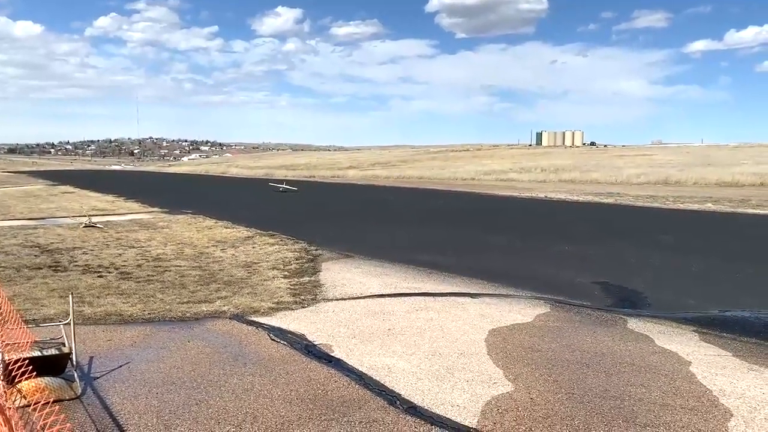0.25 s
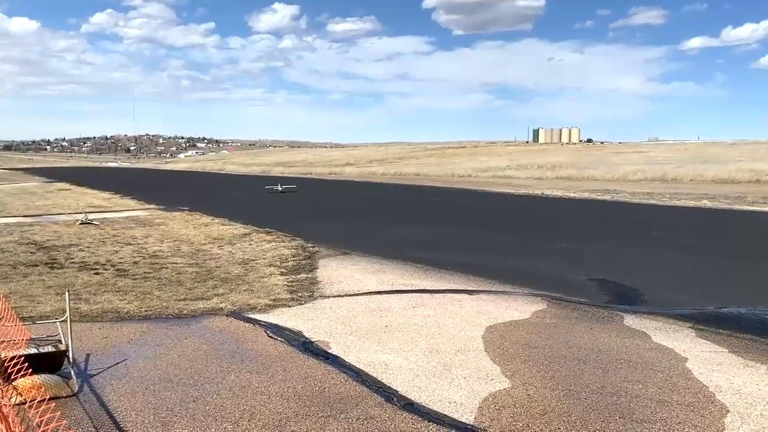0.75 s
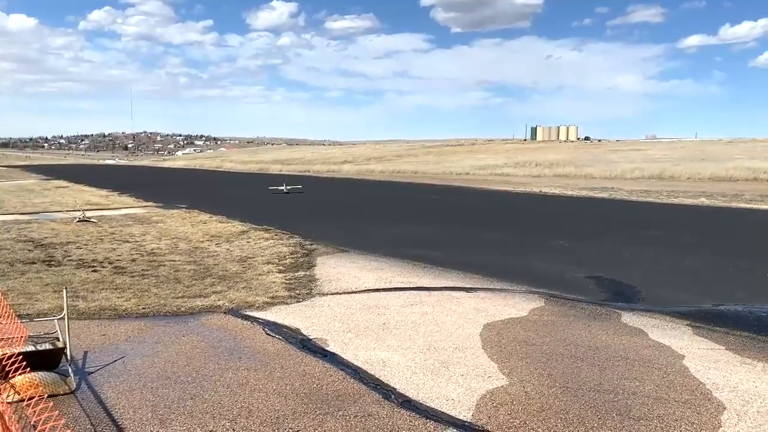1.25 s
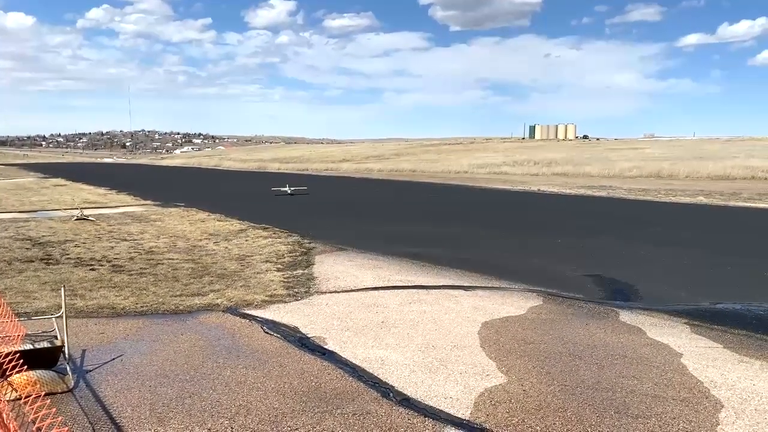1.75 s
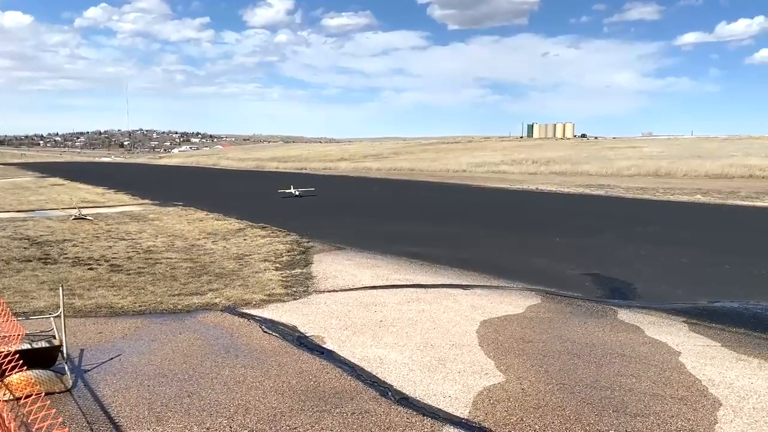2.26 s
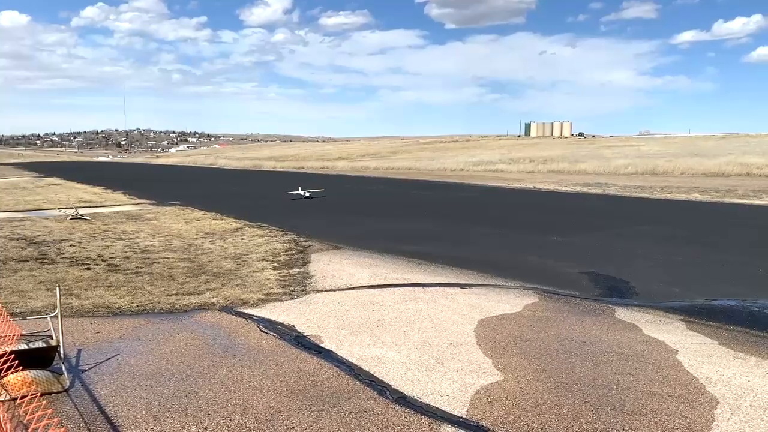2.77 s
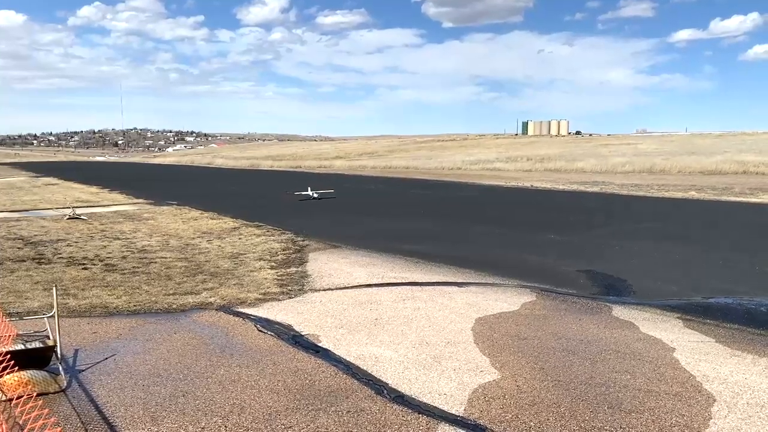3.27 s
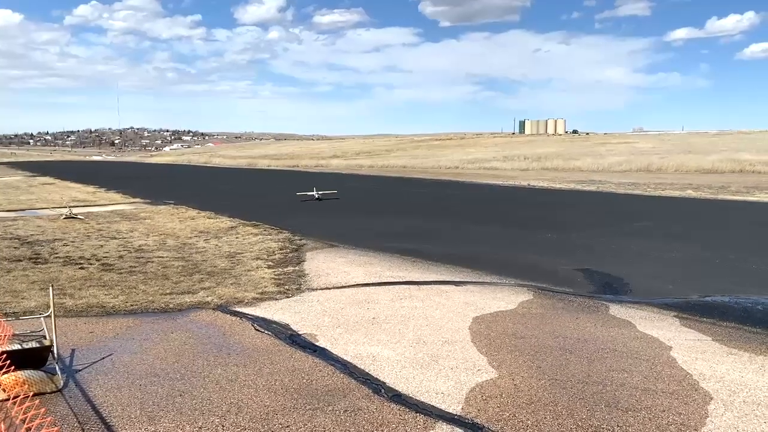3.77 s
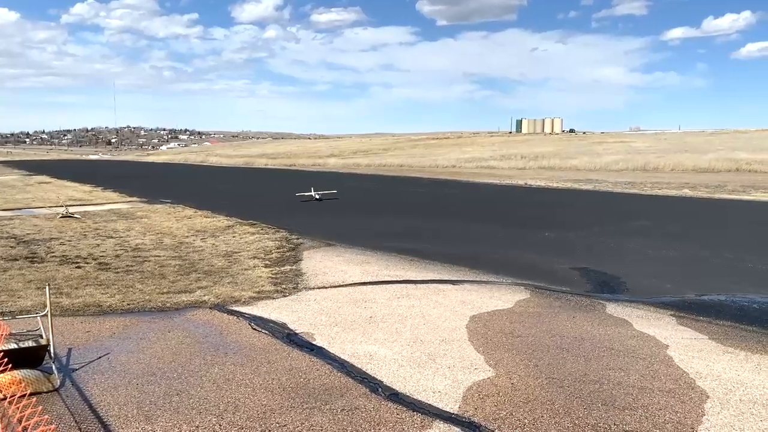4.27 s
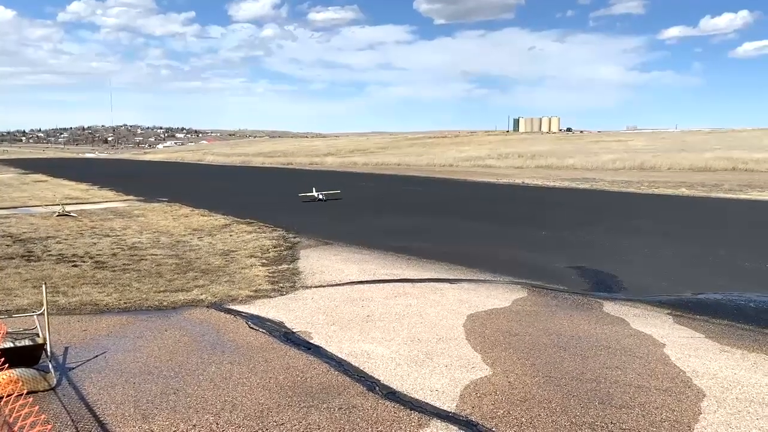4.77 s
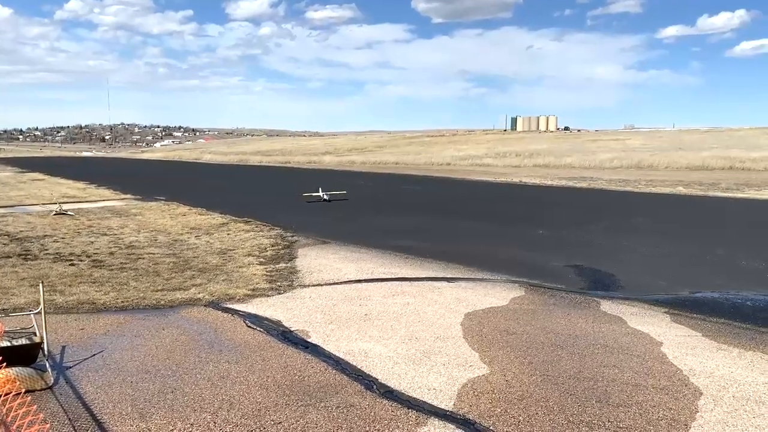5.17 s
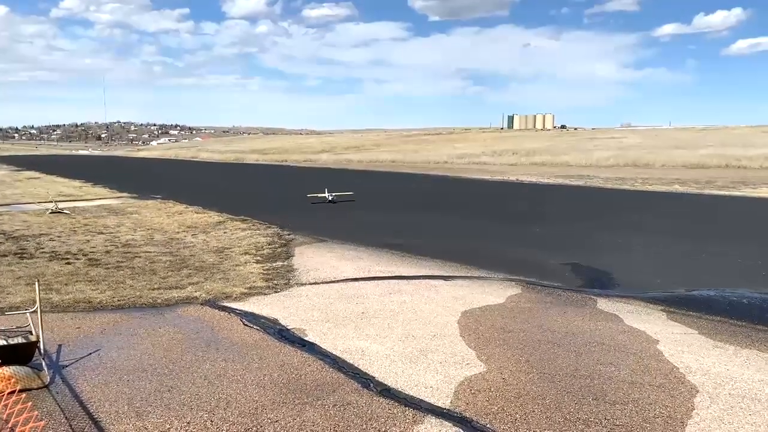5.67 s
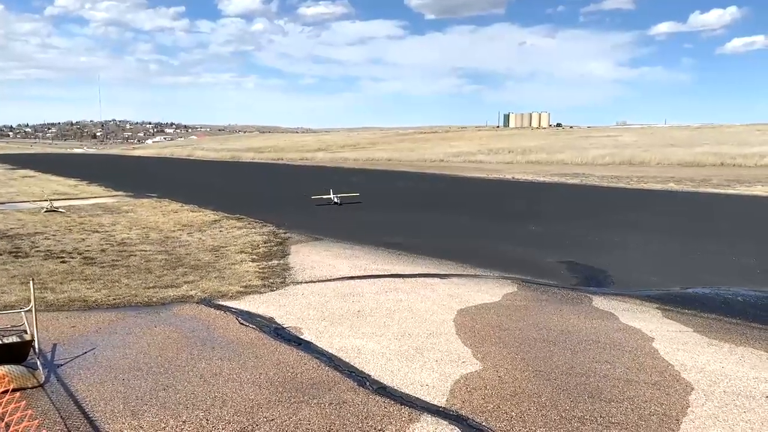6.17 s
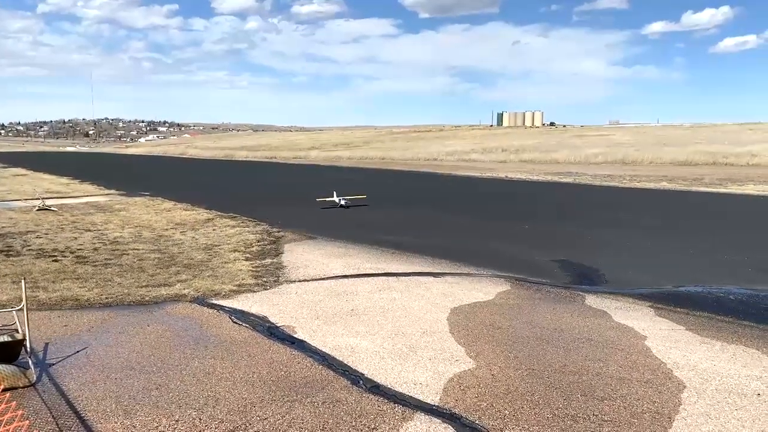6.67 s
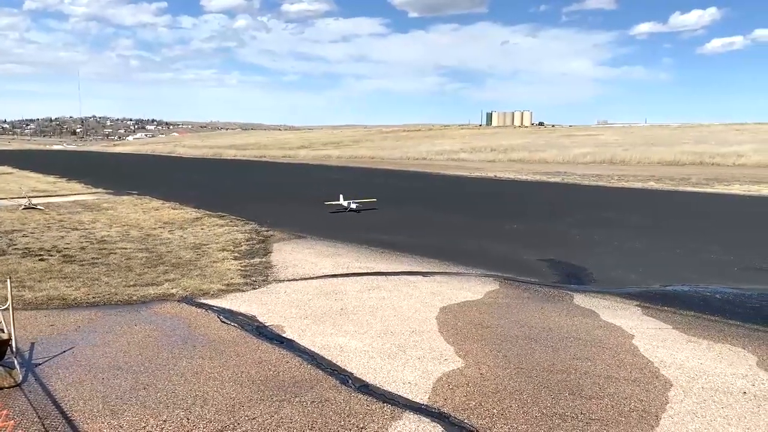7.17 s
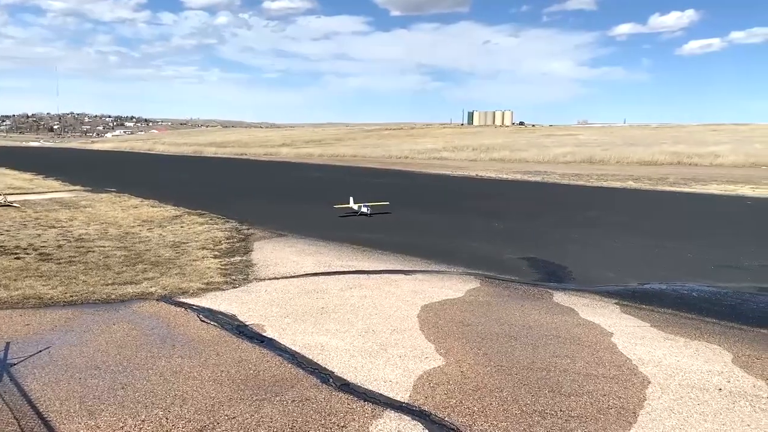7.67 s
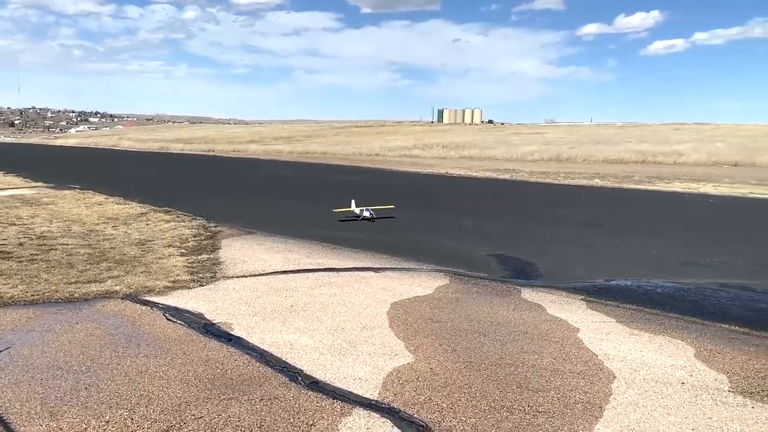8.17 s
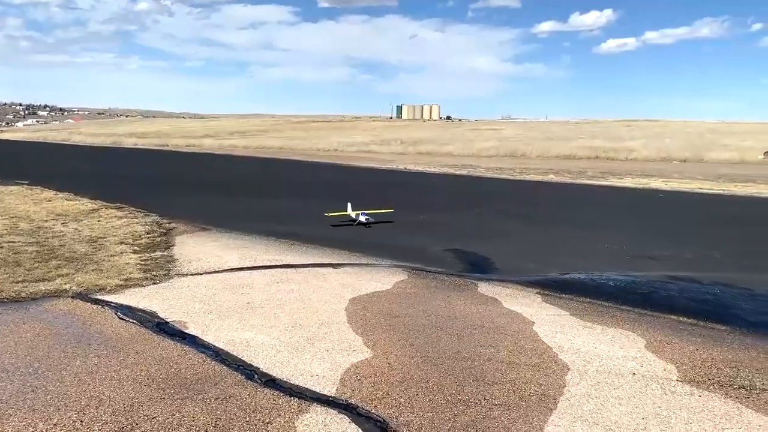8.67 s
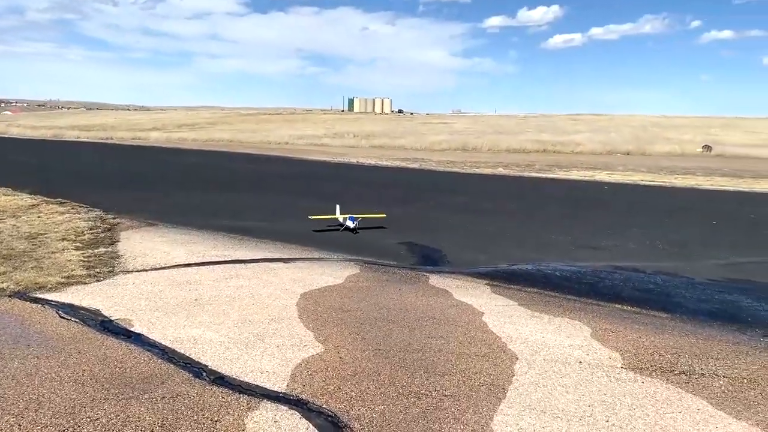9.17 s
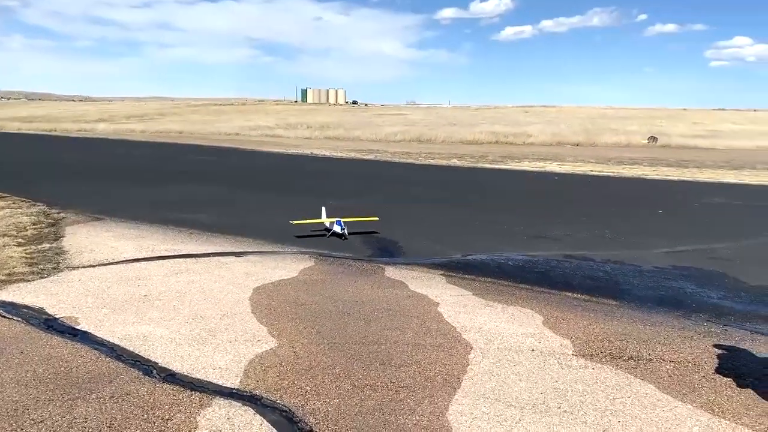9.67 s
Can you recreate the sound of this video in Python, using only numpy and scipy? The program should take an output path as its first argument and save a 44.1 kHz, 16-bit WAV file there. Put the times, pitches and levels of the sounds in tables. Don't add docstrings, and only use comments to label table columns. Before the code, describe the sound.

Faint electronic whistle and dry grass ticks under buffeting wind, then a model plane motor climbs to a steady whine, approaches and cuts out.

```python
import sys
import numpy as np
from scipy import signal
from scipy.fft import rfft, irfft, next_fast_len
from scipy.io import wavfile
from scipy.ndimage import uniform_filter1d

SR = 44100
rng = np.random.default_rng(int(sys.argv[2]) if len(sys.argv) > 2 else 0)


def dump_mix(stems):
    frames = np.atleast_2d(stems).T
    limited = np.clip(frames, -1, 1)
    pcm = np.round(limited * 32767).astype(np.int16)
    wavfile.write(sys.argv[1], SR, pcm)


def nominal_scale(level):
    x = np.asarray(level, float) / 20
    return 10 ** x


N = 437913
SIZE = next_fast_len(N)
POLE_PAIRS = 7

# time in seconds, level in dB.
ROAR = [(0.0, -54.5), (0.22, -59), (0.75, -54.5), (1.2, -54), (1.71, -56.5), (2.02, -53), (2.68, -54),
        (3.15, -56.5), (3.59, -59), (3.7, -60.5), (3.98, -64), (4.37, -59.5), (4.64, -56.5), (5.65, -50.5),
        (7.58, -45.5), (8.46, -42), (9.23, -43), (9.93, -47)]
# frequency in Hz, density in dB per Hz.
AIR_COLOUR = [(150, -13), (300, -5), (480, -11), (620, -1.5), (820, -1.5), (1150, -16.5), (1350, -6),
              (2000, -10), (2700, -11), (4600, -22), (8250, -25), (8700, -37), (11000, -34), (16000, -33)]
# start in seconds, end in seconds, change in dB.
HISS_LULLS = [
    (-.1, 0.566, -2.5),
    (2.68, 2.8, -4),
    (3.45, 3.9, -1.5),
    (9.64, 9.7, -4.5),
    (9.78, 9.855, -6),
]
# centre in Hz, width in Hz, gain in dB.
CASE_RESONANCES = [(2090, 80, -4.5), (3550, 69, 4), (4920, 240, 4), (5900, 160, -2), (8730, 1300, 10.5),
                   (1067, 240, 6.5),
                   (9950, 600, -3), (11300, 1500, -3), (12400, 450, 6), (13500, 900, -3), (2750, 900, -4.5)]
# time in seconds, level in dB.
WHIR_LEVEL = [
    (0, -73),
    (1.2, -72.5),
    (2.3, -73),
    (3.4, -85.5),
    (9.93, -83),
]
# time in seconds, frequency in Hz, level in dB.
WHISTLE = [(0.0, 8085, -84), (0.5, 8085, -74.5), (0.58, 8082, -88), (1.75, 8050, -88), (2.11, 8048, -69),
           (2.4, 8034, -73), (2.92, 8024, -67), (3.5, 8017, -71), (3.96, 8000, -80), (4.02, 8009, -63),
           (4.38, 8014, -58), (5.6, 8031, -66), (5.75, 8034, -60), (7.0, 8037, -61), (8.55, 8043, -52),
           (9.02, 8047, -54), (9.33, 8048, -70), (9.42, 8045, -100)]
# shaft order above the tone, level in dB.
BLADE_SIDEBANDS = [(2, -22), (4, -17), (6, -22), (8, -31), (14, -28)]
# time in seconds, electrical rate in Hz.
MOTOR_SPEED = [(3.55, 300), (3.7, 337), (3.9, 372), (4.0, 420), (4.12, 493), (4.26, 605), (4.29, 628),
               (4.385, 666), (4.45, 674), (4.53, 694), (4.59, 704), (4.77, 717), (5.46, 718), (5.72, 722.5),
               (7.84, 713.7), (9.0, 712.5), (9.1, 686), (9.17, 660)]
# time in seconds, magnetic effort in dB, slot whine in dB.
MOTOR_EFFORT = [(3.6, -97, -97), (3.75, -78, -93), (3.95, -56.5, -89), (4.1, -54, -75), (4.14, -48.5, -62),
                (4.27, -47, -58.5), (4.33, -51, -51.5), (4.355, -50, -69), (4.385, -51, -54.5),
                (4.6, -51.5, -54.5), (5.5, -58.5, -60.5), (7.0, -61, -58), (8.35, -54.5, -53),
                (8.8, -54.5, -60), (9.03, -59, -51), (9.12, -49, -68), (9.17, -87, -100)]
PARTIAL_ORDERS = [
    [0, 14],
    [0, 21],
    [0, 44],
    [0, 46],
    [0, 49],
    [0, 63],
    [0, 84],
    [1, -63],
    [1, -21],
    [1, -32],
    [1, -42],
    [1, 42],
    [0, 50],
    [1, -35],
]
# level in dB re effort, flutter in dB.
PARTIAL_LEVELS = [(-19, 6), (-16, 5), (-29, 4), (-27, 4), (-24, 6), (-22, 6), (-26, 6), (-23, 5), (-16, 3),
                  (-21, 4), (-14.5, 5), (-52, 5), (-18, 5), (-17, 5)]
ENTRY_HZ = {44: 650, 46: 650, 50: 650, -32: 650, 84: 525, -35: 600, 49: 430}
EXIT_HZ = {49: 540, -35: 660, -63: 540}
# frequency in Hz, gain in dB.
AIRFRAME = [(500, -17), (790, 12), (880, 14), (1100, -9), (1400, 10), (1480, 2), (1580, 6), (1700, -3),
            (2200, -8), (3100, 5), (3600, 7), (4350, 2), (4550, -10), (4800, -3), (5300, -10), (5900, -2),
            (6280, -13), (6420, 7), (6550, 7), (7000, 1), (7500, 3), (7800, -14), (11000, 19), (12300, 12)]
# time in seconds, level in dB.
BREEZE = [(0.0, -43), (0.15, -56.5), (1.16, -58.5), (1.9, -48.5), (2.2, -59.5), (3.3, -52.5), (4.45, -58.5),
          (5.35, -46.5), (6.17, -55), (6.28, -38), (6.44, -39), (6.475, -46.5), (7.15, -44), (7.35, -54.5),
          (7.55, -46.5), (8.13, -57), (8.82, -45.5), (8.93, -59)]
# time in seconds, peak in dB, brightness in dB.
EDDIES = [(0.212, -30.5, -16), (0.509, -26.5, -21), (1.691, -32, -14), (1.938, -27, -20.5),
          (2.132, -26.5, -22.5), (2.261, -22, -11.5), (2.473, -33, -8.5), (3.273, -28, -19),
          (3.382, -25, -12.5), (3.674, -19, -6.5), (4.194, -31.5, -14), (4.376, -34.5, -14.5),
          (4.511, -27.5, -14.5), (4.61, -24.5, -13), (4.693, -24, -10.5), (5.081, -34, -9),
          (5.28, -20, -12), (5.825, -33.5, -11.5), (5.894, -28, -18.5), (6.264, -20, -5), (6.408, -21, -7),
          (6.593, -27, -12.5), (6.724, -32.5, -9.5), (6.813, -22, -5), (6.911, -27, -11.5),
          (7.472, -27, -7), (7.785, -31, -11.5), (8.625, -27, -14.5), (9.002, -25, -12), (9.12, -27, -10.5)]
# time in seconds, peak in dB.
PUFFS = [(0.095, -36), (0.31, -38.5), (0.594, -34), (1.408, -41), (1.633, -35), (1.777, -30),
         (2.354, -28.5), (2.51, -39), (2.614, -35), (2.689, -36.5), (2.996, -36.5), (3.112, -38),
         (3.405, -26.5), (3.961, -34), (4.107, -36.5), (4.273, -34), (4.799, -31), (4.943, -44),
         (5.216, -39.5), (5.357, -29.5), (5.579, -40.5), (5.625, -41.5), (6.043, -35.5), (7.038, -36.5),
         (7.112, -30), (7.235, -34.5), (7.969, -45), (8.159, -55), (8.802, -31.5), (9.517, -39.5),
         (3.36, -32.5), (6.019, -40.5), (5.875, -36), (7.19, -43)]
# time in seconds, brightness in dB.
FRESHEN = [
    (0, -16),
    (4.8, -18.5),
    (5.6, -10.5),
    (7.1, -13.5),
    (8.2, -1),
    (9.93, -8),
]
# time in seconds, peak in dB.
SNAPS = [(0.213, -45), (0.513, -38.5), (1.697, -42.5), (2.134, -47), (2.259, -31.5), (2.477, -32.5),
         (2.513, -38), (3.384, -39.5), (3.409, -43), (3.442, -41), (3.64, -36.5), (3.666, -37),
         (3.678, -26.5), (3.689, -45), (3.699, -31.5), (3.731, -45), (3.751, -48), (3.762, -40),
         (3.798, -42.5), (3.847, -42), (4.197, -41.5), (4.251, -51), (4.383, -37.5), (4.513, -41),
         (4.612, -37), (4.628, -37.5), (4.697, -29.5), (4.716, -50), (4.946, -36), (5.087, -38.5),
         (5.268, -35), (5.278, -29), (5.286, -31), (5.303, -32.5), (5.427, -36), (5.63, -36.5), (5.83, -38),
         (5.9, -37.5), (6.256, -28), (6.267, -25.5), (6.294, -27.5), (6.305, -31.5), (6.326, -28),
         (6.341, -30.5), (6.351, -32), (6.365, -23.5), (6.375, -28), (6.39, -32), (6.412, -24),
         (6.422, -33), (6.437, -32.5), (6.599, -33), (6.725, -37.5), (6.752, -35.5), (6.764, -31),
         (6.804, -30.5), (6.831, -34), (6.848, -35.5), (6.918, -31), (7.475, -33.5)]
# time in seconds, peak in dB.
MORE_SNAPS = [(6.491, -39.5), (6.816, -22.5), (6.911, -34), (7.491, -33), (2.346, -40), (6.466, -31),
              (6.559, -36), (6.66, -39), (6.782, -29.5), (6.982, -43), (7.119, -38.5), (3.361, -42.5),
              (6.446, -34.5)]
# time in seconds, peak in dB, body in dB.
TICKS = [(0.415, -80, 4), (1.0365, -81, 8), (1.24, -76, 9), (1.256, -69, 18), (1.3503, -71, 13),
         (1.4017, -66, -4), (1.4825, -70, -2), (1.5349, -74, 6), (1.5653, -68, -4), (1.6721, -77, 2),
         (1.8976, -75, 6), (1.9694, -74, 0), (1.9939, -71, 3), (2.1944, -71, 18.5), (2.5486, -71, -7),
         (2.7247, -80, 12), (2.8539, -75, 4), (2.9322, -77, 7), (3.3149, -79, 3), (9.2853, -62, 11),
         (9.3594, -68, 15), (9.397, -70, 5), (9.4345, -63.5, 10), (9.5294, -63, 14), (9.6494, -72, 15),
         (9.7368, -68, 13)]
# time in seconds, peak in dB.
FAINT_TICKS = [(0.179, -73), (0.3696, -77), (0.5487, -74), (0.621, -71), (1.2052, -71), (1.3204, -65),
               (1.7689, -75), (2.4902, -69), (3.0594, -75), (3.1223, -72), (3.2106, -76), (3.266, -72),
               (3.5019, -80), (3.6596, -75), (3.9749, -72)]
# start in seconds, frequency in Hz, peak in dB, half length in seconds.
SQUEAKS = [
    (.697, 3600, -56, 0.009),
    (9.445, 9270, -57, 0.04),
    (9.265, 9400, -60, 0.02),
]
# frequency in Hz, lead of the left in radians, left minus right in dB,
# unrelated share from 0 to 1.
PORTS = [(0, -4, 3.5, 0), (518, 2.08, -4.5, 0), (700, 0.35, 1, 0.4), (1480, 0.5, -5.5, 0),
         (2210, 1.53, -9, 0.45), (2380, 3.07, 0, .01), (2700, 3.21, 0, .01), (3000, 4.6, 5, 0),
         (3600, 5.5, 9.5, 0), (5570, 7, 6, .45), (6000, 11.5, 3, 0.7), (6300, 13.8, 4, 0.5),
         (6600, 12.7, 0, .02), (7350, 12.45, 0, .02), (7650, 11.5, 0, 0.1), (7990, 11, 2.5, .15),
         (8580, 9.9, -1.5, 0), (9000, 9.45, 0, 0)]
# time in seconds, lower edge in Hz,
# upper edge in Hz, unrelated share that fills the null from 0 to 1.
BEARING = [(0, 2170, 2330, .08), (2.2, 2250, 2480, .07), (4, 2340, 2620, .02), (7.3, 2380, 2800, .12),
           (8.3, 2480, 3080, .16), (8.75, 2330, 3080, .01), (9.2, 2330, 2830, .01), (9.35, 2300, 2700, .14),
           (9.93, 2300, 2650, .12)]


def curves(rows):
    s, *columns = np.transpose(rows)
    return [np.interp(np.arange(N) / SR, s, c) for c in columns]


def colour(hz, rows):
    knots_hz, db = np.transpose(rows)
    return np.interp(np.log(np.maximum(hz, 1)), np.log(knots_hz), db)


def spectrum_hz():
    return np.arange(SIZE // 2 + 1) * SR / SIZE


def unit(x):
    return x / np.sqrt(np.mean(x ** 2))


def walk(rate):
    k = int(SR / rate)
    held = np.repeat(rng.standard_normal(N // k + 1), k)
    return 0.874 * uniform_filter1d(uniform_filter1d(held, k), k)[:N]


def band(x, lo_hz, hi_hz):
    return signal.sosfilt(signal.butter(2, [lo_hz, hi_hz], "band", fs=SR, output="sos"), x)


def add(out, s, grain):
    i = max(int(s * SR), 0)
    out[i:i + len(grain)] += grain[:max(len(out) - i, 0)]


def air():
    roar_db, = curves(ROAR)
    effort_db, _ = curves(MOTOR_EFFORT)
    t = np.arange(N) / SR
    hiss_db = -67.5 + 0.6 * (roar_db + 54.5) + 0.8 * np.maximum(effort_db + 56.5, 0)
    lull_db = sum(db * ((t > start) & (t < end)) for start, end, db in HISS_LULLS)
    hiss_db = hiss_db + uniform_filter1d(lull_db, SR // 25)
    top_db = -84 + (roar_db + 55.5) + 0.46 * np.maximum(effort_db + 64.5, 0)
    hz = spectrum_hz()
    case_db = sum(db / (1 + (2 * (hz - f) / width) ** 2) for f, width, db in CASE_RESONANCES)
    noise = rfft(rng.standard_normal((2, SIZE))) * nominal_scale(colour(hz, AIR_COLOUR) + case_db)
    out, puff, rustle = 0, walk(22), walk(70)
    for centre in 2 ** np.arange(7, 14.1, .5):
        mask = np.clip(1 - 2 * np.abs(np.log2(np.maximum(hz, 1) / centre)), 0, 1)
        to_hiss = np.clip(np.log2(centre / 1880), 0, 1)
        to_top = np.clip(2 * np.log2(centre / 8400), 0, 1)
        db = roar_db + to_hiss * (hiss_db + 12 - roar_db) + to_top * (top_db + 13 - hiss_db)
        flicker_db = 0.15 * puff + (2.12 + 0.2 * to_hiss + 0.78 * to_top) * rustle + 1.74 * walk(30)
        out = out + nominal_scale(db + flicker_db) * irfft(noise * np.sqrt(mask), SIZE)[:, :N]
    return nominal_scale(14) * out


def whir():
    centre_hz, width_hz = 3540, 320
    hum = band(rng.standard_normal(N), centre_hz - width_hz / 2, centre_hz + width_hz / 2)
    return unit(hum) * nominal_scale(curves(WHIR_LEVEL)[0] + 5.7 * walk(60))


def whistle(turn, switch):
    _, level_db = curves(WHISTLE)
    electrical_hz, = curves(MOTOR_SPEED)
    effort_db, _ = curves(MOTOR_EFFORT)
    twinkle = nominal_scale(1.2 * walk(30) + 1.8 * walk(90)) * (1 + 0.28 * walk(500))
    out = nominal_scale(level_db + 6.5) * twinkle * np.sin(switch)
    spun_up = np.clip((electrical_hz - 600) / 100, 0, 1) * (effort_db > -75)
    for order, db in BLADE_SIDEBANDS:
        out = out + spun_up * nominal_scale(level_db + 4 + db) * np.sin(switch + order * turn)
    return out


def slot_whine(turn):
    _, whine_db = curves(MOTOR_EFFORT)
    twinkle_db = 1.46 * walk(50) + 1.55 * walk(13) + 0.55 * walk(110)
    level = nominal_scale(uniform_filter1d(whine_db, SR // 30) + 1.5 + twinkle_db) * (1 + 0.32 * walk(400))
    return level * np.sin(6 * POLE_PAIRS * turn)


def magnetic_orders(turn, switch, shaft_hz, switch_hz):
    electrical_hz, = curves(MOTOR_SPEED)
    effort_db, whine_db = curves(MOTOR_EFFORT)
    out = 0
    for (multiple, order), (db, flutter_db) in zip(PARTIAL_ORDERS, PARTIAL_LEVELS):
        enter = np.clip((electrical_hz - ENTRY_HZ.get(order, 0)) / 15, 0, 1)
        leave = np.clip((EXIT_HZ.get(order, 9999) - electrical_hz) / 30, 0, 1)
        drive_db = effort_db
        if order == -6 * POLE_PAIRS:
            drive_db = np.minimum(whine_db, effort_db) + 2.5
        body_db = colour(multiple * switch_hz + order * shaft_hz, AIRFRAME)
        level = nominal_scale(drive_db + db + body_db + flutter_db * walk(55))
        out = out + enter * leave * level * np.sin(multiple * switch + order * turn)
    return out


def motor():
    electrical_hz, = curves(MOTOR_SPEED)
    shaft_hz = electrical_hz / POLE_PAIRS * (1 + 0.00196 * walk(60))
    switch_hz = uniform_filter1d(curves(WHISTLE)[0], SR // 2) + 5.15 * walk(25)
    turn, switch = np.cumsum(2 * np.pi / SR * np.array([shaft_hz, switch_hz]), axis=1)
    return whistle(turn, switch) + slot_whine(turn) + magnetic_orders(turn, switch, shaft_hz, switch_hz)


def wake(times, peaks_db, settle_s):
    kicks = np.zeros(N)
    kicks[(times * SR).astype(int)] = nominal_scale(peaks_db)

    def fade(x, s):
        return signal.lfilter([1], [1, -np.exp(-1 / (s * SR))], x)

    rise = fade(kicks[::-1], 0.0071)[::-1]
    return fade(kicks, settle_s) + rise - kicks


def eddy(top_hz, life_s, phase, fall_s=0.001942):
    t = np.arange(int(6 * life_s * SR)) / SR
    cycles = top_hz * fall_s * np.log(1 + t / fall_s) + 55 * t
    return np.sin(2 * np.pi * cycles + phase) * (1 - np.exp(-t / 0.0027)) * np.exp(-t / life_s)


def rumble(breeze_db, at, peak_db):
    top_db = -33.5
    wake_db = 0.99 * (peak_db + 29) - 26.5 - 20
    level = nominal_scale(-52.5 + 1.62 * (breeze_db + 50.5)) + wake(at, wake_db, 0.067)
    level_db = -10 * np.log10(level ** -2 + nominal_scale(-2 * top_db))
    noise = band(band(rng.standard_normal(N), 39, 94.4), 30.5, 127)
    even = noise / np.sqrt(uniform_filter1d(noise ** 2, SR // 8))
    return even * nominal_scale(level_db + 3.5 + 3 * walk(25))


def small_eddies(small_db):
    out = np.zeros(N)
    for when, size, pitch, life, phase in rng.random((1400, 5)):
        faster = nominal_scale(0.4046 * (small_db[int(when * N)] + 50))
        swirl = eddy(240 * faster * 4 ** pitch, 0.015 + 0.0074 * life, 2 * np.pi * phase)
        add(out, when * N / SR, nominal_scale(2.75 * -np.log(size)) * swirl)
    return out / np.sqrt(uniform_filter1d(out ** 2, SR // 5) + 1e-9) * nominal_scale(small_db - 1)


def gust_crackle(small_db):
    out = np.zeros(N)
    for when, size, pitch, phase in rng.random((900, 4)):
        gust_db = min(small_db[int(when * N)], -31)
        db = gust_db - 19 + 0.64 * (gust_db + 21) - 2.7 * np.log(size)
        add(out, when * N / SR, nominal_scale(db) * eddy(1400 + 900 * pitch, 0.0015, 2 * np.pi * phase))
    return out


def listed_eddies(eddies):
    out = np.zeros(N)
    for (s, db, bright_db), chance in zip(eddies, rng.random((len(eddies), 3, 3))):
        top_hz = 950 * nominal_scale(0.2 * bright_db)
        for k, (pitch, phase, delay) in enumerate(chance):
            swirl = eddy(top_hz * (0.716 + 0.647 * pitch), 0.015, 2 * np.pi * phase)
            add(out, s + 0.0018 + 0.01 * k * (.5 + delay), nominal_scale(db - 1 - 6 * k) * swirl)
    return out


def gust_snaps():
    out = np.zeros(N)
    snaps = list(SNAPS) + MORE_SNAPS
    for (s, db), (pitch, phase) in zip(snaps, rng.random((len(snaps), 2))):
        top_hz = (1750 + 300 * pitch) * nominal_scale(0.245 * (db + 31.5))
        add(out, s, nominal_scale(db + 8.5) * eddy(top_hz, 0.0061, 4 + 1.57 * phase, fall_s=0.001049))
    return out


def wind():
    breeze_db, = curves(BREEZE)
    puffs = [(s, db, np.interp(s, *np.transpose(FRESHEN))) for s, db in PUFFS]
    eddies = list(EDDIES) + puffs
    at, peak_db, bright_db = np.transpose(eddies)
    small_db = 20 * np.log10(nominal_scale(breeze_db) + wake(at, peak_db + bright_db - 2, 0.044))
    low = rumble(breeze_db, at, peak_db)
    small = small_eddies(small_db)
    strong = gust_crackle(small_db) + listed_eddies(eddies) + gust_snaps()
    both = low + band(band(small + strong, 25, 1500), 19, 2200)
    apart = nominal_scale(-17) * np.roll(small + low, SR // 30)
    lag = 0.18 * np.log2(1 + spectrum_hz() / 11)
    late = irfft(rfft(both, SIZE) * np.exp(-1j * lag), SIZE)[:N]
    return np.array([nominal_scale(0.1) * late + apart, both - apart])


def ticks():
    out, t = np.zeros(N), np.arange(300) / SR
    scattered = [(when * N / SR, -85 - 2.2 * np.log(size), 3) for when, size in rng.random((160, 2))]
    rows = list(TICKS) + [(s, db - 7, 0) for s, db in FAINT_TICKS] + scattered
    for (s, db, body_db), crack in zip(rows, rng.standard_normal((len(rows), len(t)))):
        click = crack * np.exp(-t / 0.0011)
        body = nominal_scale(body_db - 4) * band(click, 3000, 5600)
        add(out, s, nominal_scale(db + 19) * (band(click, 8500, 15500) + body))
    return out


def squeaks():
    out = np.zeros(N)
    for s, hz, db, half_s in SQUEAKS:
        t = np.arange(int(2 * half_s * SR)) / SR
        swell = np.sqrt(np.abs(np.sin(np.pi * t / t[-1])))
        add(out, s, nominal_scale(db) * swell * np.sin(2 * np.pi * hz * t))
    return out


def ports(x, other):
    hz, t = spectrum_hz(), np.arange(N) / SR
    knots, *columns = np.transpose(PORTS)
    times = np.transpose(BEARING)[0]
    side, out = np.array([[1], [-1]]), 0
    x, other = rfft(x, SIZE), rfft(other, SIZE)
    lag = np.maximum(2 * np.pi * 10.9 / SR * (hz - 9120), 0)
    lag = lag - .33 * np.sin(2 * lag)
    for k, (_, lo_hz, hi_hz, share) in enumerate(BEARING):
        moved = np.r_[knots[:4], .93 * lo_hz, lo_hz, hi_hz, hi_hz + 320, knots[8:]]
        lead, balance_db, alone = (np.interp(hz, moved, c) for c in columns)
        alone = alone + share * ((hz > .93 * lo_hz) & (hz < 1.05 * hi_hz))
        turn = np.exp(.5j * side * (lead - lag))
        mixed = x + np.clip(alone, 0, 1) * side * other
        heard = irfft(mixed * nominal_scale(side * balance_db / 2) * turn, SIZE)[:, :N]
        out = out + heard * np.interp(t, times, np.arange(len(BEARING)) == k)
    return out


def scene():
    noise, other = air()
    plane = motor() + noise + squeaks() + whir()
    return ports(plane + ticks(), other * nominal_scale(5.7 * walk(14) - 2)) + wind()


def top_cut(x):
    return signal.sosfilt(signal.butter(12, 16900, fs=SR, output="sos"), x)


def record(dry):
    cut = signal.sosfilt(signal.butter(3, 38, "high", fs=SR, output="sos"), dry)
    cut = signal.sosfilt(signal.ellip(10, .3, 70, 15620, fs=SR, output="sos"), cut)
    mix = np.tanh(3 * cut) / 3
    return top_cut(mix)


dry = scene()
out = record(dry)
dump_mix(out)
```